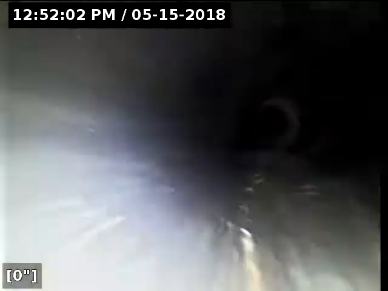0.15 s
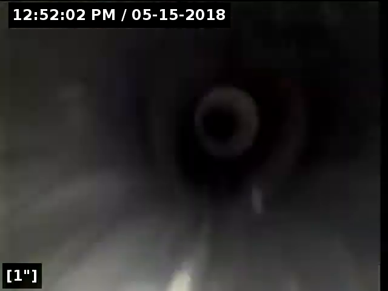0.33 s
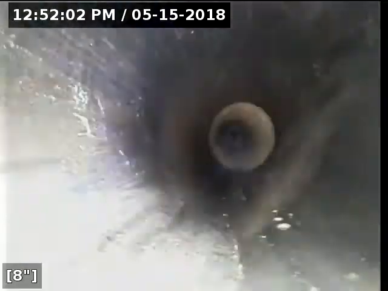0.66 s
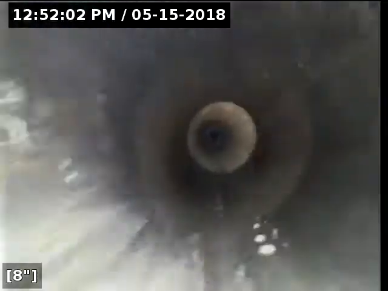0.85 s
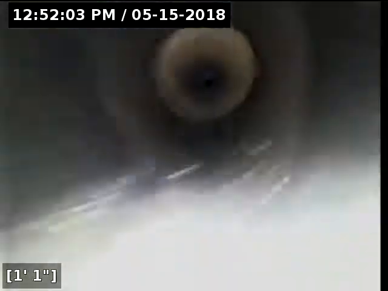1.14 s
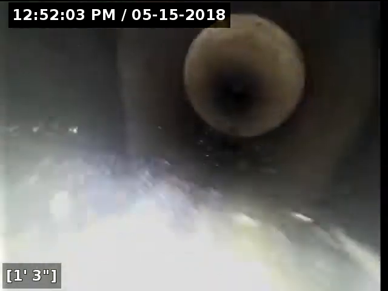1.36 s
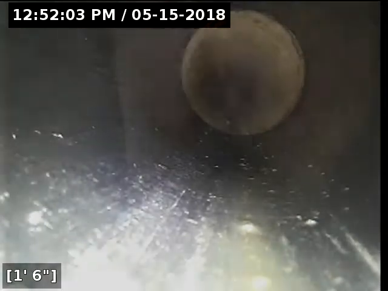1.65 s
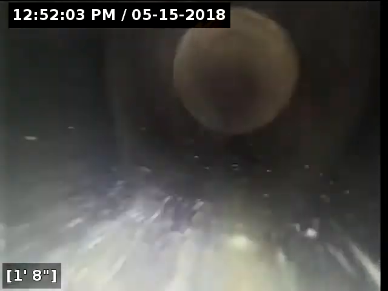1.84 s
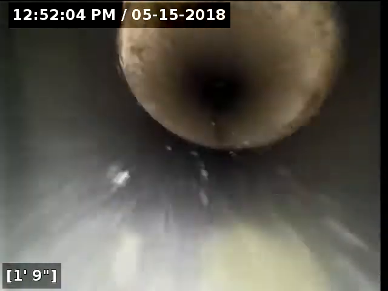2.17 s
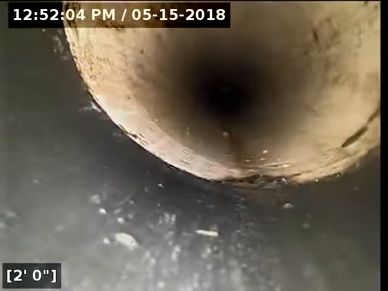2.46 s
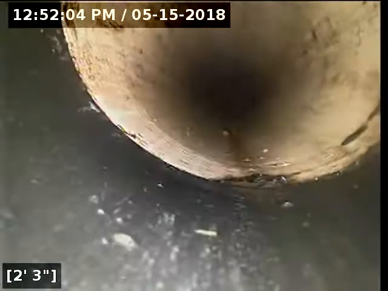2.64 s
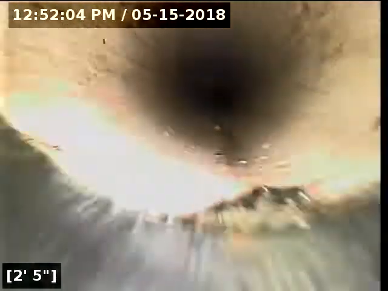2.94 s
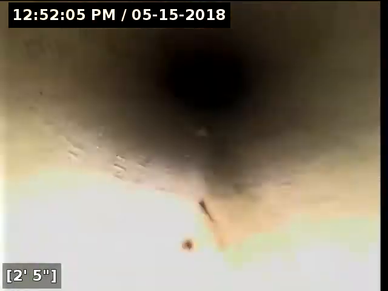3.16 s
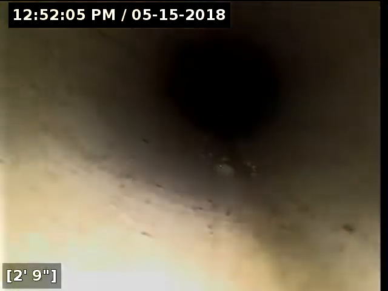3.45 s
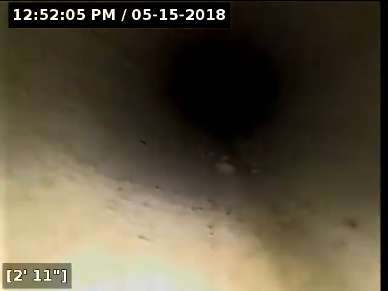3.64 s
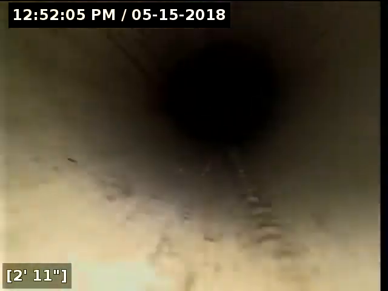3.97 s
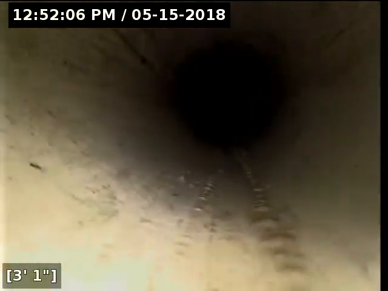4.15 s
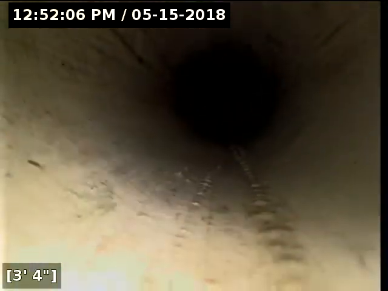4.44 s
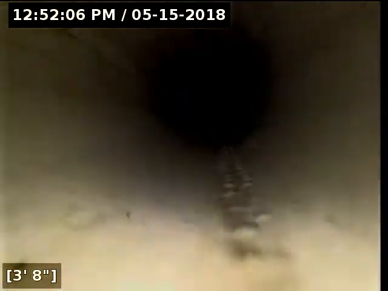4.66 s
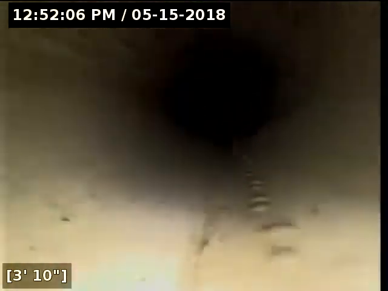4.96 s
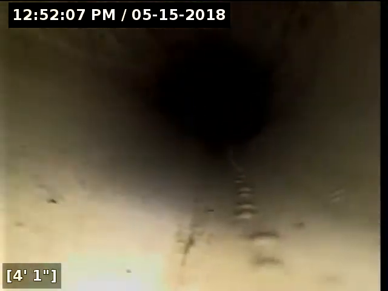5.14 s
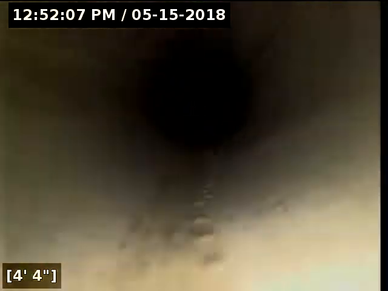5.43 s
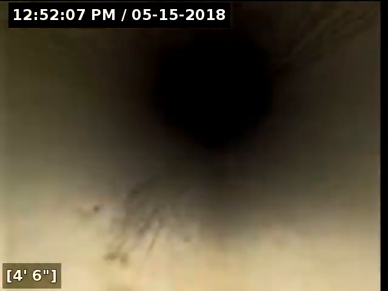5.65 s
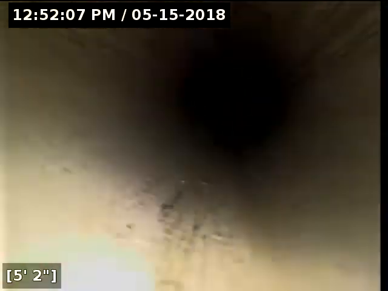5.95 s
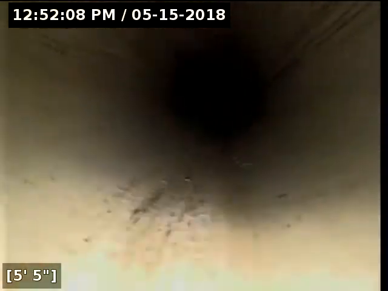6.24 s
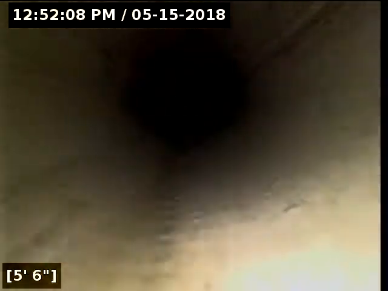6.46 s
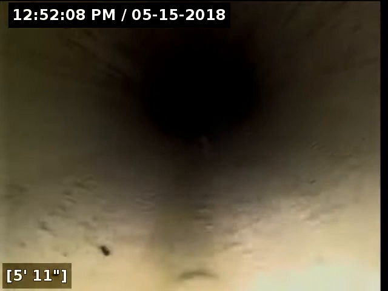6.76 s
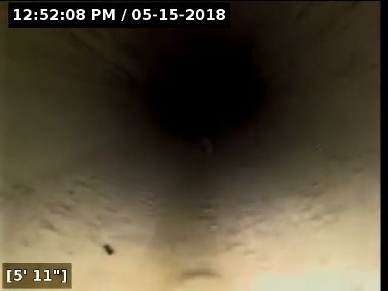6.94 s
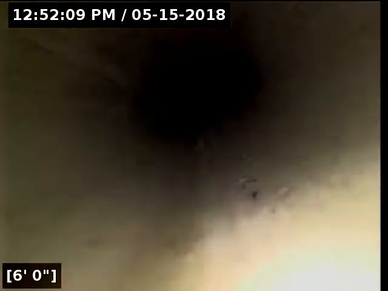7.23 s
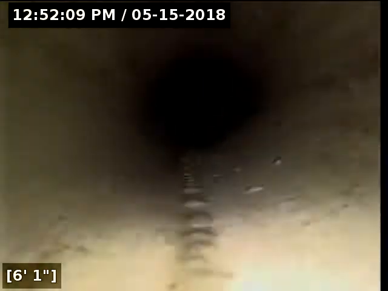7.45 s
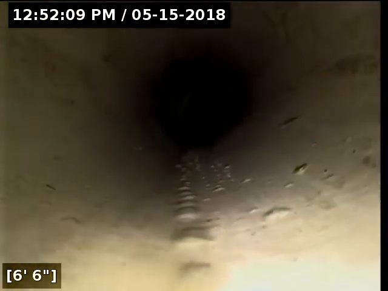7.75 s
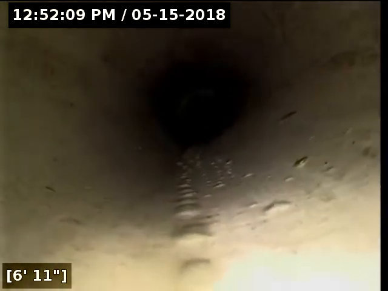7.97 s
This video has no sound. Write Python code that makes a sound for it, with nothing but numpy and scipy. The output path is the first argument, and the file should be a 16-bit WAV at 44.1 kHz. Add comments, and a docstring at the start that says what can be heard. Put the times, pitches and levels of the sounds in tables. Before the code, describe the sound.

Irregular hollow clunks and clicks from a camera cable rubbing through a pipe, each swelling into a dull boom above low hum and faint hiss.

```python
"""Push cable in a drain pipe

A camera on a stiff cable is shoved down a pipe, heard through a narrow-band microphone. Rubbing is filtered
noise from random contacts: it surges with each shove, glides on, stalls and breaks free, and squeals at times.
Each knock disperses along the cable into a falling chirp, rattles, and soon after swells a low hum into a boom.
The sound channel hisses, overloads on the hardest knocks, clicks and cuts out once."""
import sys
import numpy as np
from scipy import signal
from scipy.fft import rfft, irfft
from scipy.io import wavfile
from scipy.ndimage import uniform_filter1d

SR = 44100
rng = np.random.default_rng(int(sys.argv[2]) if len(sys.argv) > 2 else 0)


def dump_mix(stems):
    """Bounce the given channels to the path in sys.argv[1] as a 16-bit WAV at rate SR."""
    frames = np.atleast_2d(stems).T  # one column per channel
    limited = np.clip(frames, -1, 1)  # hard clip at full scale
    pcm = np.round(limited * 32767).astype(np.int16)
    wavfile.write(sys.argv[1], SR, pcm)


N = 357210
TIME = np.arange(N) / SR

# hiss of the sound channel: [f/Hz, relative level/dB]
HISS_RESPONSE = [(200, -10.5), (3000, 2.5), (4300, -8), (5500, 2), (7300, 1), (9000, -29)]
HISS_DB = -72.5  # rms, before the channel's filters
# thin clicks in the sound channel, two of them at the edges of the dropout: [t/s, level/dB]
CHANNEL_CLICKS = [(2.7405, -30), (6.601, -28), (6.728, -26)]
DROPOUT_START_S, DROPOUT_END_S = 6.601, 6.728
NOTCH_HZ, TOP_HZ = 3980, 8250  # dip at the edge of the speech band; upper limit of the channel

# low hum between the booms: [t/s, level before HUM_GAIN_DB/dB]
HUM_LEVELS = [(0.0, -56), (0.63, -32), (0.88, -47), (3.3, -44.5), (3.45, -50), (3.75, -50.5), (4.25, -34.5),
              (4.4, -43.5), (4.65, -48.5), (4.84, -38.5), (5.37, -44.5), (5.81, -33), (6.3, -44.5),
              (6.75, -35), (6.866, -49), (7.486, -35.5), (7.614, -28.5), (8.1, -41)]
HUM_HZ, HUM_GAIN_DB = 185, 6
HUM_STEADY, HUM_FLUTTER, HUM_WAVER_HZ = 0.54, 0.38, 3  # amplitude shares; rms frequency wander
BEAT_HZ, BEAT_SHARE = 19, 0.4  # a weaker twin resonance just above beats with the hum
BOOM_HALF_S = .004  # half length at zero delay
BOOM_SPREAD = .26  # half length gained per s of delay: the farther a boom travels, the more it spreads
BOOM_RING_DB, BOOM_RING_S = -18.5, 0.062  # level and time constant of the ringing after a boom

# narrow resonances of the cable and its fittings: [f/Hz, width/Hz, level over the broad response before boosts/dB]
RESONANCES = [(290.6, 83, 6), (506, 49.6, 9), (596.7, 38, 10), (772.4, 10, 10), (839, 14, 10.5),
              (939, 40, 8.5), (1200, 94, 4.5), (1270.7, 20, 12.5), (1641, 37, 15), (2017, 10, 11.5),
              (2390, 23, 12.5), (2980, 140, 6.5), (3200, 110, 8.5), (3547, 52, 16)]
# broad response to the scrape: [f/Hz, relative level/dB]
SCRAPE_RESPONSE = [(25, -45), (70, -9), (125, 0.5), (250, -4.5), (380, -4.5), (520, -2.5), (900, -5.5),
                   (1250, -7), (1450, -15), (1850, -32), (2500, -30), (3700, -53)]
# broad response to the fine grit: [f/Hz, relative level/dB]
GRIT_RESPONSE = [(600, -42.5), (1400, -3), (2300, 1.5), (2800, -8), (3600, -15), (4300, -20.5),
                 (7000, -17.5), (9000, -50)]
# shoves of the cable: [start t/s, length/s, scrape level/dB, fine grit level/dB], before surges and stalls
SHOVES = [(0.01, 0.36, -42.5, -52), (0.627, 0.29, -34.5, -53), (1.267, 0.11, -54, -53),
          (1.763, 0.34, -45.5, -56.5), (2.717, 0.26, -39, -53), (3.52, .28, -37.5, -51.5),
          (4.46, 0.21, -32.5, -50), (4.85, 0.062, -36, -56), (5.217, 0.24, -36, -49),
          (5.517, 0.12, -39, -52), (5.81, 0.2, -37, -55.5), (6.128, 0.31, -40, -53),
          (7.146, 0.25, -34.5, -51), (7.592, 0.42, -33.5, -52.5)]
SHOVE_ATTACK_S, SHOVE_RELEASE_S = 0.081, .085
GLIDE_SCRAPE_DB, GLIDE_GRIT_DB = -37, -59  # between shoves the cable glides on
# the cable slows almost to a stop, then breaks free: [t of breaking free/s, length of slowing/s, scrape drop/dB]
CABLE_STALLS = [(0.05, 0.075, 2), (1.792, 0.54, 4.5), (3.56, 0.26, 5.5), (7.13, 0.33, 8)]
STALL_HOLD = 0.29  # share of the slowing spent at a crawl
GRIT_STALL_RATIO = 1.3  # dB of grit lost per dB of scrape

# brief faint squeals of the rubbing cable: [t at the top/s, f/Hz, level/dB, half length/s]
RUBBING_SQUEALS = [(0.109, 1280, -34.5, 0.014), (0.295, 2400, -51, 0.014), (0.744, 2400, -49.5, 0.012),
                   (2.32, 1640, -50, 0.026), (5.848, 1280, -36, 0.011), (6.053, 2400, -50, 0.01),
                   (6.367, 2400, -52, 0.045), (6.459, 1280, -34.5, 0.019), (7.483, 2400, -54, 0.029)]

# knocks of the cable: [t/s, body level/dB, body f/Hz, sharp tick level/dB, low boom level/dB, boom delay/s]
CABLE_KNOCKS = [(0.067, -26.5, 730, -49, -27.5, 0.028), (0.152, -40, 560, -47, -43, .03),
                (0.162, -28, 547, -59, -28, 0.042), (0.233, -28, 575, -62, -27, 0.02),
                (0.323, -33.5, 730, -52, -40, 0.037), (0.478, -31, 630, -51, -36.5, 0.039),
                (0.488, -17.5, 653, -46.5, -23.5, .026), (0.583, -28.5, 574, -45, -30, .04),
                (0.754, -18, 653, -60, -18, 0.035), (0.777, -27, 786, -59, -34, 0.023),
                (0.928, -31, 634, -57, -31.5, 0.03), (1.497, -30, 790, -69, -32.5, 0.043),
                (2.038, -28, 570, -68, -29, 0.027), (2.077, -26, 670, -46.5, -33, 0.043),
                (2.43, -35.5, 814, -71, -38, 0.027), (2.632, -19, 693, -51.5, -28, 0.022),
                (2.652, -38, 734, -63, -40, 0.038), (2.8, -34.5, 910, -59, -49, 0.02),
                (2.964, -27, 574, -51, -32, 0.033), (2.996, -25.5, 725, -41.5, -34, 0.057),
                (3.055, -24.5, 690, -32, -27.5, 0.037), (3.269, -30.5, 765, -65, -35, 0.061),
                (3.3, -28, 607, -53, -33, 0.068), (3.495, -37, 720, -65, -46, .03),
                (3.728, -26, 620, -55, -35, 0.023), (3.746, -23.5, 625, -42.5, -23, 0.026),
                (4.091, -28.5, 744, -50.5, -26, 0.027), (4.196, -19, 660, -40.5, -24, 0.036),
                (4.609, -22.5, 810, -39, -42, 0.036), (4.616, -16, 645, -29, -36, .033),
                (4.626, -26.5, 700, -42, -40, 0.03), (4.697, -24, 784, -46.5, -39, 0.0073),
                (4.899, -28.5, 940, -57, -27, 0.038), (4.931, -26.5, 685, -48, -25.5, 0.029),
                (4.945, -28.5, 900, -43, -34, 0.034), (5.174, -36.5, 875, -59, -40, 0.038),
                (5.424, -26, 594, -52, -28.5, 0.047), (5.569, -31, 684, -53, -41, 0.027),
                (5.756, -23.5, 760, -48, -19, 0.059), (5.954, -18, 650, -68.5, -16.5, .032),
                (6.1, -28.5, 740, -77.5, -32, 0.025), (6.185, -32.5, 710, -69, -48, 0.028),
                (6.4, -32, 587, -59, -35, .03), (6.514, -29, 563, -71, -22.5, .031),
                (6.825, -25, 660, -54, -27.5, 0.056), (6.858, -30, 576, -66, -33.5, 0.048),
                (7.142, -10, 622, -38.5, -35, 0.039), (7.167, -13.5, 610, -40.5, -27, 0.025),
                (7.198, -14.5, 604, -37, -30, 0.052), (7.228, -24, 624, -46, -34, 0.044),
                (7.297, -11.5, 690, -26, -15.5, 0.035), (7.314, -19.5, 547, -67, -31, 0.021),
                (7.352, -21, 510, -56, -28, .05), (7.595, -15.5, 640, -38.5, -34, 0.027),
                (7.77, -19.5, 667, -63, -25, 0.038), (7.922, -21, 720, -42.5, -34, 0.02),
                (8.054, -35, 625, -56, -47, 0.039)]
# broad response of a knock's body, at the reference pitch: [f/Hz, relative level/dB]
BODY_RESPONSE = [(20, -21.5), (40, -13.5), (100, -5.5), (170, -26.5), (260, -3.5), (400, -9.5), (600, 1),
                 (800, -5), (1100, -12.5), (1600, -23), (2000, -34), (3500, -64.5)]
BODY_REFERENCE_HZ = 650
# broad response of a knock's tick: [f/Hz, relative level/dB]
TICK_RESPONSE = [(500, -7.5), (1100, -3.5), (1600, -2), (2200, 6), (2900, -2), (3600, -18), (4500, -17.5),
                 (6500, -12.5), (9000, -33)]
KNOCK_RING_DB = -2  # a knock excites the narrow resonances less than rubbing does


def undb(db):
    """Logarithmic level: decibels to an amplitude gain."""
    return 10 ** (np.asarray(db) / 20)


def unit(x):
    """Normalisation to unit rms."""
    return x / np.sqrt(np.mean(x ** 2))


def curve(table, axis):
    """Linear interpolation in time of one column of a table."""
    rows = np.array(table)
    return np.interp(TIME, rows[:, 0], rows[:, axis])


def bell(s, half_s):
    """Gaussian envelope: a smooth rise and fall around s seconds."""
    return np.exp(-.5 * np.minimum(((TIME - s) / half_s) ** 2, 100))


def add(track, s, sound):
    """Superposition: mix a sound into a track at s seconds."""
    i = max(int(s * SR), 0)
    track[i:i + len(sound)] += sound[:max(N - i, 0)]


def walk(rate):
    """Smoothed random process: new values at the given rate in Hz, averaged and scaled to unit rms."""
    k = int(SR / rate)
    steps = np.repeat(rng.standard_normal(N // k + 1), k)
    return unit(uniform_filter1d(steps, k)[:N])


def colour(x, points):
    """Minimum-phase filtering: the cepstrum is folded to make the given [f/Hz, level/dB] response causal."""
    size = 4096
    hz, db = np.transpose(points)
    axis_hz = np.arange(size // 2 + 1) * SR / size
    gain = undb(np.interp(np.log(axis_hz + 1), np.log(hz), db))
    cepstrum = irfft(np.log(gain))
    cepstrum[1:size // 2] *= 2
    cepstrum[size // 2 + 1:] = 0
    impulse = irfft(np.exp(rfft(cepstrum)))
    return signal.fftconvolve(x, impulse)[:len(x)]


def ring(x, boosts_db):
    """Modal resonance: narrow modes add to a vibration, each with its own boost."""
    out = x
    for (hz, width_hz, db), boost_db in zip(RESONANCES, boosts_db):
        mode = signal.lfilter(*signal.iirpeak(hz, hz / width_hz, fs=SR), x)
        out = out + (undb(db + boost_db) - 1) * mode
    return out


def disperse(x, lag_s, corner_hz):
    """Dispersion of bending waves: the lower the pitch, the later it arrives."""
    hz = np.arange(len(x) // 2 + 1) * SR / len(x)
    delay_s = lag_s / np.sqrt(1 + (hz / corner_hz) ** 2)
    phase = 2 * np.pi * np.cumsum(delay_s) * SR / len(x)  # phase is the integral of group delay
    return irfft(rfft(x) * np.exp(-1j * phase), len(x))


def channel_hiss():
    """Stationary noise of the sound channel, shaped by a fixed response."""
    return undb(HISS_DB) * unit(colour(rng.standard_normal(N), HISS_RESPONSE))


def hum():
    """Resonance and beating: rubbing drives a fluttering low mode; the delayed bass of each knock makes it boom."""
    boom = np.zeros(N)
    for s, _, _, _, db, delay_s in CABLE_KNOCKS:
        boom += undb(db) * bell(s + delay_s, BOOM_HALF_S + BOOM_SPREAD * delay_s)
    keep = np.exp(-1 / (BOOM_RING_S * SR))
    boom = boom + undb(BOOM_RING_DB) * signal.lfilter([1 - keep], [1, -keep], boom)
    twin_hz = BEAT_HZ + HUM_WAVER_HZ * walk(9.2)  # offset from the hum
    twin = BEAT_SHARE * np.exp(2j * np.pi * np.cumsum(twin_hz) / SR)
    flutter = HUM_FLUTTER * (walk(45) + 1j * walk(45))
    rubbed = undb(curve(HUM_LEVELS, axis=1) + HUM_GAIN_DB) * (HUM_STEADY + twin + flutter)
    phase = 2 * np.pi * np.cumsum(HUM_HZ + HUM_WAVER_HZ * walk(25)) / SR
    return np.sqrt(2) * np.real((rubbed + 1j * boom) * np.exp(1j * phase))


def grains(per_s, spread_db):
    """Random impulse train: dense tiny contacts of very unequal size."""
    hit = rng.random(N) < per_s / SR
    size_db = spread_db * np.minimum(rng.exponential(size=N), 4)
    return hit * rng.standard_normal(N) * undb(size_db)


def shove_gain(levels_db, glide_db):
    """Addition of powers: each shove rises, holds and dies away over the steady glide."""
    power = undb(glide_db) ** 2
    for (s, length_s, _, _), db in zip(SHOVES, levels_db):
        rise = np.clip((TIME - s) / SHOVE_ATTACK_S, 0, 1)
        fall = np.exp(-np.maximum(TIME - s - length_s, 0) / SHOVE_RELEASE_S)
        power = power + (undb(db) * rise * fall) ** 2
    return np.sqrt(power)


def stalls_db(free_s=0.0074):
    """Static friction: rubbing fades as the cable binds and returns within free_s when it breaks free."""
    change_db = np.zeros(N)
    for s, slow_s, drop_db in CABLE_STALLS:
        corners_s = [s - slow_s, s - STALL_HOLD * slow_s, s, s + free_s]
        change_db -= drop_db * np.interp(TIME, corners_s, [0, 1, 1, 0])
    return change_db


def sliding():
    """Friction noise: countless small bumps surge unevenly; the resonances come and go as the contact moves."""
    surge_db = 1.4 * walk(35)
    boosts_db = [2.2 * walk(18) for _ in RESONANCES]
    bumps = grains(per_s=1500, spread_db=2.2)
    dust = grains(per_s=5000, spread_db=1.9)
    bending = disperse(bumps, lag_s=.016, corner_hz=261.3)
    scrape = colour(ring(bending, boosts_db), SCRAPE_RESPONSE)
    grit = colour(ring(dust, boosts_db), GRIT_RESPONSE)
    _, _, scrape_db, grit_db = np.transpose(SHOVES)
    stall_db = stalls_db()
    scrape = unit(scrape) * shove_gain(scrape_db, GLIDE_SCRAPE_DB) * undb(stall_db)
    grit = unit(grit) * shove_gain(grit_db, GLIDE_GRIT_DB) * undb(GRIT_STALL_RATIO * stall_db)
    return undb(surge_db) * (scrape + grit)


def squeals(rough=.012):
    """Stick-slip oscillation: now and then the friction locks onto one resonance and makes it sing."""
    clock = np.cumsum(1 + rough * walk(220)) / SR  # uneven time roughens the tone
    out = np.zeros(N)
    for s, hz, db, half_s in RUBBING_SQUEALS:
        out += undb(db) * bell(s, half_s) * np.sin(2 * np.pi * hz * clock)
    return np.sqrt(2) * out


def contact(t, rattle_db, rattle_t60, chatter_db, chatter_s):
    """Impact force: a blow, a rebound 4-8 ms on, a dying rattle, and a short chatter as the surfaces meet."""
    rattle = undb(rattle_db - 60 * np.abs(t) / rattle_t60) * (t > .002)
    chatter = undb(chatter_db) * np.exp(-np.abs(t) / chatter_s)
    force = (rattle + chatter) * rng.standard_normal(len(t))
    force[np.argmin(np.abs(t))] += 1
    force[np.argmin(np.abs(t - rng.uniform(.004, .008)))] += .6
    return force


def knocks(hard_db=-42, dull_slope=.7):
    """Impact excitation: each blow gives a short bright tick and a hollow body, chirping by dispersion."""
    out, lead_s, size = np.zeros(N), .02, 8192
    t = np.arange(size) / SR - lead_s
    attack = (t > -.002) & (t < .018)  # the stretch over which levels are set
    for s, body_db, pitch_hz, tick_db, _, _ in CABLE_KNOCKS:
        boosts_db = KNOCK_RING_DB + rng.standard_normal(len(RESONANCES))
        blow = contact(t, rattle_db=-29, rattle_t60=.14, chatter_db=-27, chatter_s=.004)
        wave = disperse(blow, lag_s=0.01113, corner_hz=124.8)
        body_response = [(hz * pitch_hz / BODY_REFERENCE_HZ, db) for hz, db in BODY_RESPONSE]
        body = colour(ring(wave, boosts_db), body_response)
        # a light touch lasts longer, so its tick is weaker in the top octave
        dull_db = dull_slope * min(tick_db - hard_db, 0)
        snap = contact(t, rattle_db=-12, rattle_t60=.05, chatter_db=-7, chatter_s=.002)
        tick_response = [(hz, db + dull_db * (hz > NOTCH_HZ)) for hz, db in TICK_RESPONSE]
        tick = colour(ring(snap, boosts_db), tick_response)
        body = body / np.std(body[attack]) * undb(body_db)
        tick = tick / np.std(tick[attack]) * undb(tick_db)
        add(out, s - lead_s, body + tick)
    return out


def scene():
    """Superposition of hum, scrape, squeals and knocks at one microphone."""
    return (hum() + sliding() + squeals() + knocks())[None]


def record(dry):
    """Nonlinear, band-limited channel: lopsided overload, hiss, a notch, a dropout, clicks and a steep top."""
    high_pass = signal.butter(1, 20, "high", fs=SR, output="sos")
    bent = signal.sosfilt(high_pass, dry + .35 * dry ** 2)
    clipped = bent / (1 + (bent / .56) ** 8) ** (1 / 8)  # saturates at .56
    wet = clipped + channel_hiss()
    wet = signal.lfilter(*signal.iirnotch(NOTCH_HZ, 5.5, fs=SR), wet)
    wet = wet * ((TIME < DROPOUT_START_S) | (TIME > DROPOUT_END_S))
    for s, db in CHANNEL_CLICKS:
        add(wet[0], s, undb([db]))  # a single sample
    low_pass = signal.ellip(8, .2, 80, TOP_HZ, fs=SR, output="sos")
    return signal.sosfilt(low_pass, wet)


dry = scene()
out = record(dry)
dump_mix(out)
```